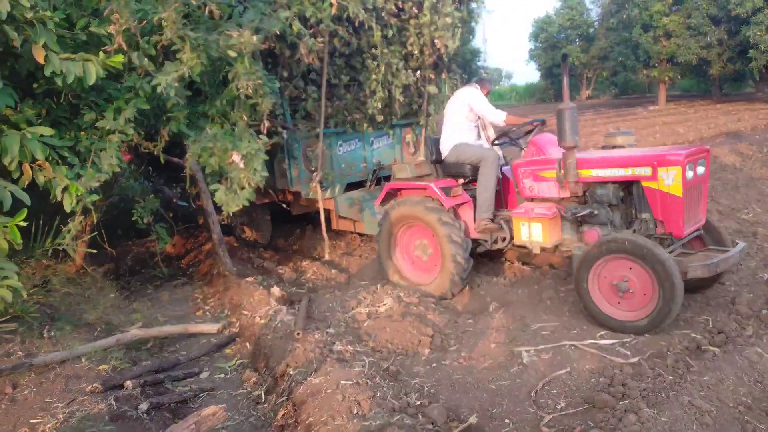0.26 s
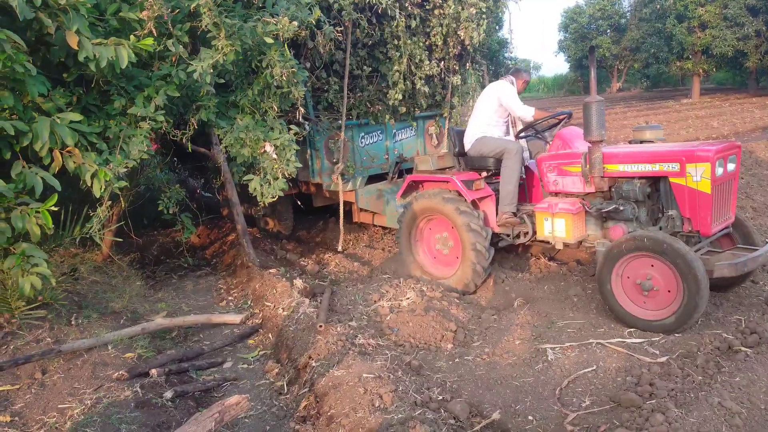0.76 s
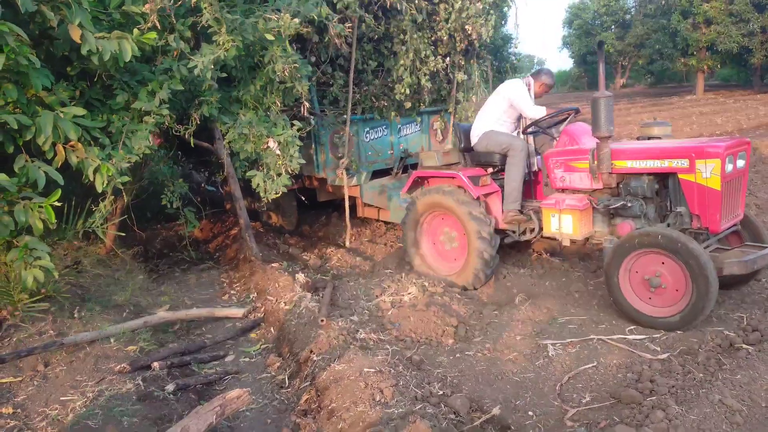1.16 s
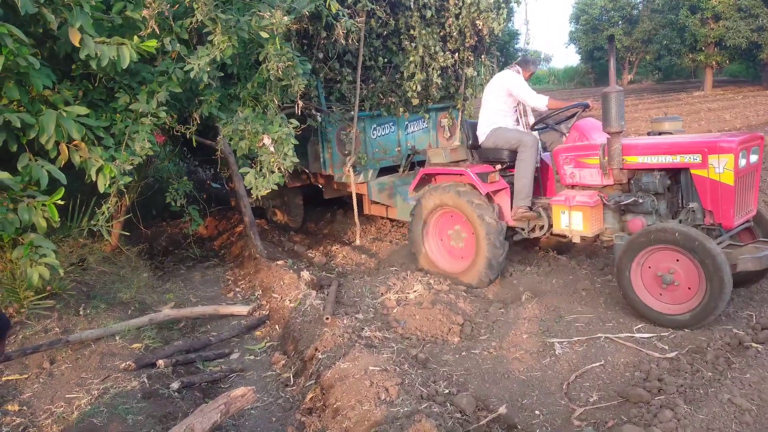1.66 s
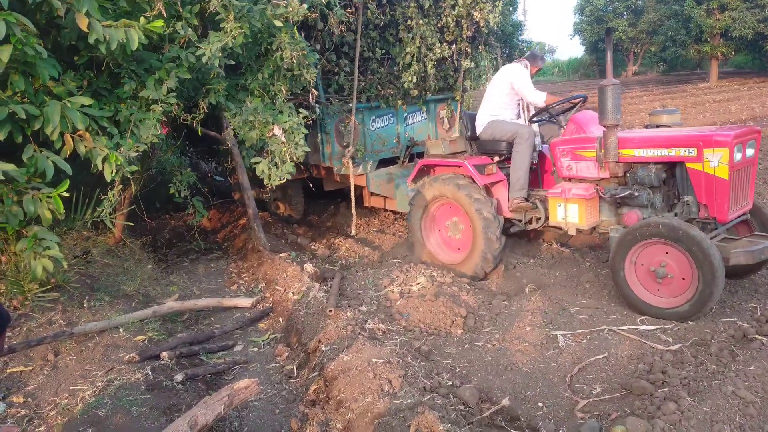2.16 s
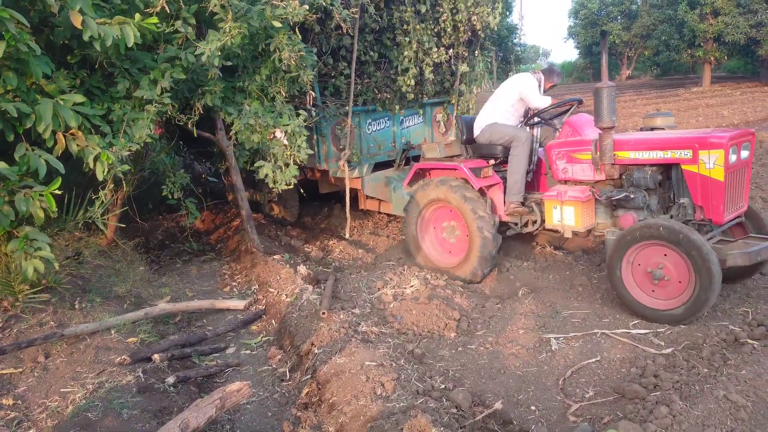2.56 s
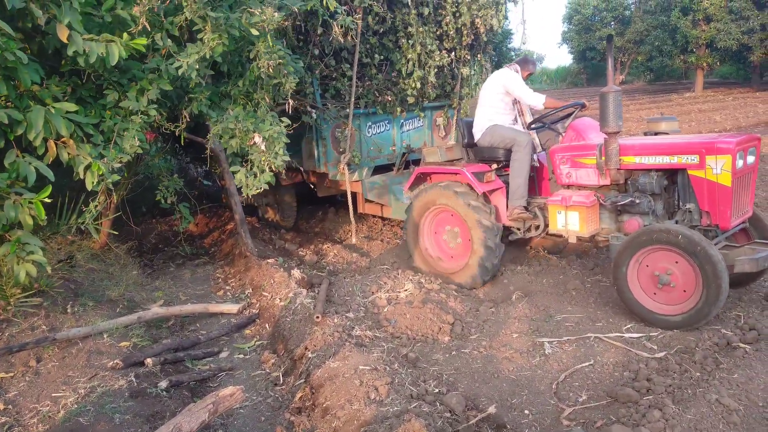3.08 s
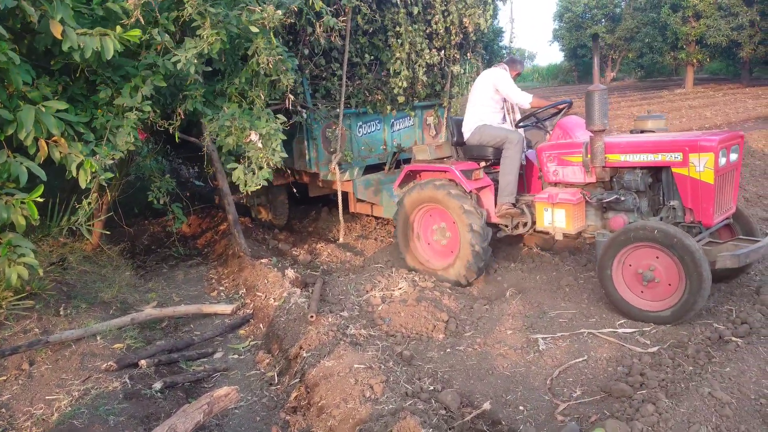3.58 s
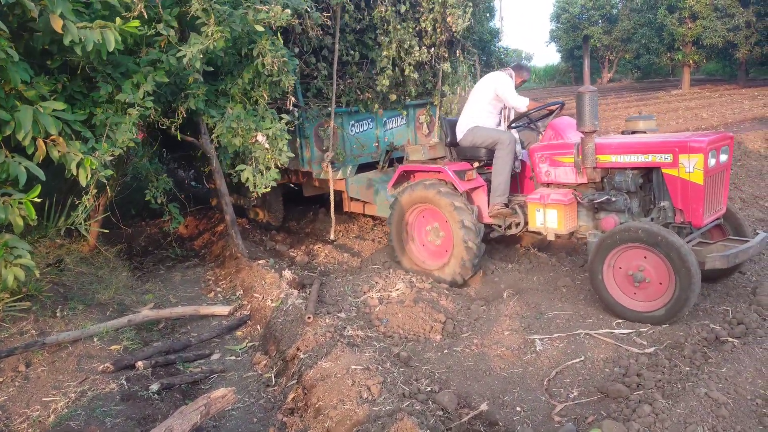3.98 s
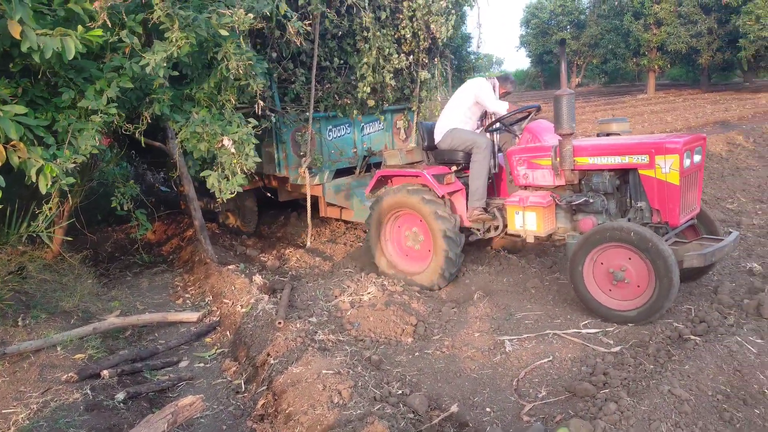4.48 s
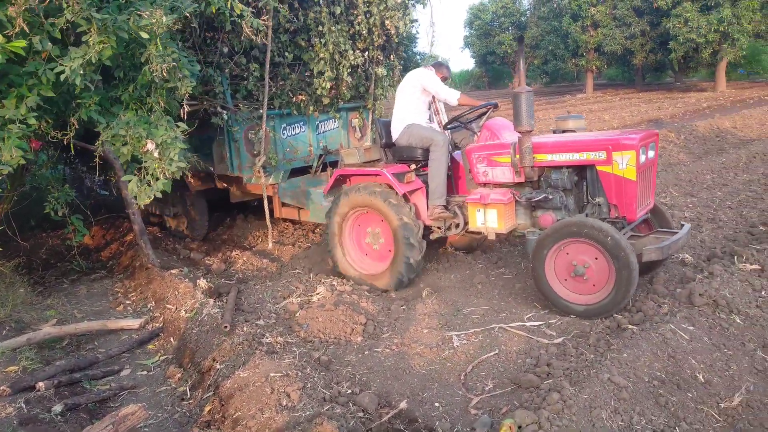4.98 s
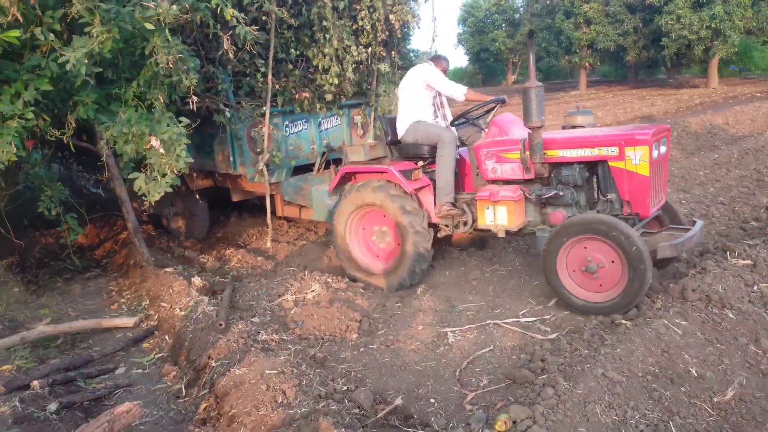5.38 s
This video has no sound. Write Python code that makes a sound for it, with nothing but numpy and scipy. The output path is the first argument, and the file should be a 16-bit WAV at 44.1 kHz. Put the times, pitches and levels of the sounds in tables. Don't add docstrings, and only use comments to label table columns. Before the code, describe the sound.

A small single-cylinder diesel tractor pops hard and fast, dropping several times into soft clattering puffs before the loud bursts return.

```python
import sys
import numpy as np
from scipy import signal
from scipy.fft import rfft, irfft
from scipy.io import wavfile

SR = 44100
rng = np.random.default_rng(int(sys.argv[2]) if len(sys.argv) > 2 else 0)


def magnitude_from_level(level_db):
    exponent = np.asarray(level_db, float) / 20
    return 10 ** exponent


def output_pcm(signal):
    pcm = np.clip(np.atleast_2d(signal).T, -1, 1) * 32767
    wavfile.write(sys.argv[1], SR, np.round(pcm).astype(np.int16))


N = 248724
SLUG_SAMPLES = round(0.07 * SR)


def rms_one(x):
    return x / np.sqrt(np.mean(x ** 2) + 1e-20)


def curve(rows, column):
    rows = np.array(rows)
    return np.interp(np.arange(N) / SR, rows[:, 0], rows[:, column])


def drift(rate_hz):
    settle = 9000
    r = np.exp(-2 * np.pi * rate_hz / SR)
    slow = signal.lfilter([1], [1, -2 * r, r * r], rng.standard_normal(N + settle))
    return rms_one(slow[settle:])


def lay(times, pieces):
    out = np.zeros(N + SR)
    for s, piece in zip(times, pieces):
        start = round(s * SR)
        out[start:start + len(piece)] += piece
    return out[:N]


def ring(clicks, hz, t60):
    r, w = magnitude_from_level(-60 / (t60 * SR)), 2 * np.pi * hz / SR
    return signal.lfilter([0, np.sin(w)], [1, -2 * r * np.cos(w), r * r], clicks + 1e-18)


def resonance(x, hz, width_hz):
    r = np.exp(-np.pi * width_hz / SR)
    feedback = [1, -2 * r * np.cos(2 * np.pi * hz / SR), r * r]
    return signal.lfilter([(1 - r * r) / 2, 0, (r * r - 1) / 2], feedback, x)


def coloured(x, spectrum):
    hz = np.maximum(np.fft.rfftfreq(N, 1 / SR), 1)
    points = np.array(spectrum)
    level_db = np.interp(np.log(hz), np.log(points[:, 0]), points[:, 1])
    return rms_one(irfft(rfft(x) * magnitude_from_level(level_db), N))


# (time [s], level [dB])
GEAR_LEVEL = [(0.0, -46), (0.45, -43), (0.67, -46.5), (0.91, -49.5), (1.13, -50), (1.24, -42), (1.36, -46),
              (1.44, -44), (1.9, -42), (2.12, -44.5), (2.56, -49.5), (2.76, -45.5), (2.92, -43),
              (3.08, -44.5), (3.71, -42), (3.9, -46), (4.04, -48.5), (4.3, -48), (4.48, -42.5), (4.7, -44),
              (5.64, -41)]
# (frequency [Hz], level [dB per Hz])
CLATTER_SPECTRUM = [(24, -47), (40, -44), (85, -5), (152, 3.5), (358, -1.5), (656, -10.5), (957, -4),
                    (1800, -10.5), (2200, -2.5), (3050, -13), (4340, -32), (4800, -27), (5730, -33.5),
                    (15300, -45.5), (16500, -56)]


def running_gear():
    heights = magnitude_from_level(2.6 * rng.exponential(1, N)) * rng.choice([-1, 1], N)
    grains = heights * (rng.random(N) < 2500 / SR)
    contacts = 0.42 * rms_one(grains) + rng.standard_normal(N)
    level_db = curve(GEAR_LEVEL, 1) + 1.5 + 2.2 * drift(38)
    return magnitude_from_level(level_db) * coloured(contacts, CLATTER_SPECTRUM)


# (time [s], fundamental [Hz], level [dB])
SQUEAK_PATH = [
    (5.17, 880, -73),
    (5.19, 907, -48),
    (5.23, 950, -56),
    (5.25, 940, -80),
    (5.31, 970, -78),
    (5.33, 982, -42),
    (5.4, 1020, -49),
    (5.46, 1033, -44),
    (5.5, 1060, -75),
]


def squeak():
    hz = curve(SQUEAK_PATH, 1) * (1 + 0.0038 * drift(39))
    phase = 2 * np.pi * np.cumsum(hz) / SR
    return magnitude_from_level(curve(SQUEAK_PATH, 2) + 3) * (np.sin(2 * phase) + magnitude_from_level(-10) * np.sin(phase))


# (share of cycle [1], level unfuelled [dB], level fuelled [dB], frequency [Hz], t60 [s])
BLOCK_BLOWS = [
    (0.6, -56, -65, 4200, .03),
    (0.79, -72.5, -60, 4750, .03),
    (0.94, -45, -32.5, 1080, 0.015),
    (0.92, -82.5, -35.5, 2250, 0.031),
    (.82, -68.5, -40, 2900, 0.015),
    (0.26, -49.5, -45, 1116, 0.079),
    (0.36, -73, -40.5, 2200, 0.026),
]


def block():
    s, thump_db = np.transpose(EXHAUST_STROKES)[:2]
    fuel = np.clip((thump_db[1:] + 54) / 15, 0, 1)
    chance = rng.standard_normal((len(s) - 1, len(BLOCK_BLOWS), 2))
    shake = np.exp(-np.arange(300) / 92)
    out = 0
    for k, (share, idle_db, fuelled_db, hz, t60) in enumerate(BLOCK_BLOWS):
        at = s[:-1] + np.diff(s) * np.clip(share + 0.018 * chance[:, k, 0], 0, 1)
        uneven_db = 2.2 * np.clip(chance[:, k, 1], -2, 2)
        size = magnitude_from_level(idle_db + fuel * (fuelled_db - idle_db) + uneven_db - 16.5)
        rattle = lay(at, size[:, None] * shake) * rng.standard_normal(N)
        out = out + resonance(ring(rattle, hz, t60), hz, 840)
    return out


def gas_slug(start_ms, rise_ms, hold_ms, fall_ms):
    ms = np.maximum(np.arange(SLUG_SAMPLES) / SR * 1000 - start_ms, 0)
    rise = np.sin(np.pi / 2 * np.minimum(ms / rise_ms, 1))
    fall = np.exp(-np.maximum(ms - hold_ms, 0) / fall_ms)
    return rise * fall, ms / 1000


# (time [s], thump [dB], silencer whistle [dB], rasp [dB], hiss [dB], whistle frequency [Hz])
EXHAUST_STROKES = [(0.0028, -21.5, -15, -29, -47.5, 1097), (0.0635, -22, -19.5, -27.5, -49, 1050),
                   (0.1251, -23, -17.5, -27, -50.5, 1075), (0.186, -22.5, -19.5, -26, -49.5, 1030),
                   (0.248, -22.5, -15.5, -32, -48, 1070), (0.3079, -22.5, -20, -25, -47, 1035),
                   (0.3689, -22.5, -19.5, -27, -46.5, 1050), (0.4278, -22.5, -14, -26.5, -48, 1066),
                   (0.4855, -21.5, -19.5, -23, -46.5, 1130), (0.5435, -23, -14.5, -26.5, -48, 1140),
                   (0.5989, -27, -31, -35, -53, 1300), (0.6644, -52, -41, -52, -73, 960),
                   (0.719, -48, -39, -44, -67, 1080), (0.775, -42, -36, -49, -66, 1080),
                   (0.8331, -42, -44, -48, -67, 990), (0.893, -46, -43, -46, -67, 1040),
                   (0.9476, -51, -45, -69, -68, 1070), (1.0095, -54, -40, -52, -68, 1220),
                   (1.0659, -50, -52, -59, -71, 1030), (1.1342, -46, -52, -50, -67, 1220),
                   (1.1787, -37.5, -43, -52, -63, 1190), (1.2421, -25.5, -20.5, -33, -53, 1114),
                   (1.3067, -23.5, -18.5, -33, -51.5, 1020), (1.37, -24, -15.5, -23, -48.5, 1056),
                   (1.434, -23, -16, -26.5, -48.5, 1065), (1.497, -24, -18.5, -24, -49.5, 1060),
                   (1.561, -23.5, -19.5, -25.5, -46.5, 1010), (1.625, -23.5, -18, -23.5, -44.5, 1047),
                   (1.6881, -23, -18, -19, -46, 1006), (1.7518, -26, -20, -26, -47.5, 1005),
                   (1.8156, -23.5, -19, -21.5, -50.5, 1054), (1.879, -23, -18.5, -25, -48, 1050),
                   (1.9406, -22.5, -17.5, -23, -47.5, 1055), (2.001, -24, -19, -29, -49, 1100),
                   (2.0607, -26.5, -29.5, -33.5, -55, 1230), (2.1184, -31, -37, -42, -60, 1300),
                   (2.1922, -63, -46, -50, -65, 950), (2.251, -52, -42, -49, -64, 1110),
                   (2.3039, -45, -39, -57, -61, 1100), (2.369, -50, -43, -50, -64, 1000),
                   (2.4286, -43.5, -46, -53, -68, 1110), (2.4907, -44.5, -39, -44, -65, 1020),
                   (2.5515, -52, -41, -45, -64, 1080), (2.617, -47, -50, -60, -69, 1070),
                   (2.6833, -53, -43, -55, -74, 1000), (2.7323, -25.5, -21.5, -29.5, -49.5, 1064),
                   (2.8011, -24.5, -22.5, -29, -50, 1065), (2.869, -22.5, -19, -27, -46.5, 1004),
                   (2.9374, -23, -20, -28, -46.5, 1067), (3.005, -22, -21.5, -26.5, -49.5, 1023),
                   (3.073, -22.5, -19.5, -29.5, -45.5, 1043), (3.1393, -23, -22.5, -26.5, -49, 1014),
                   (3.207, -23.5, -16, -29, -47, 1100), (3.276, -24.5, -19, -25.5, -48.5, 1113),
                   (3.3428, -23.5, -20, -28, -49, 1020), (3.4103, -24.5, -19.5, -28, -46.5, 1073),
                   (3.4771, -23, -19, -28.5, -50.5, 1014), (3.5442, -22.5, -18, -25.5, -48.5, 1070),
                   (3.609, -24.5, -18.5, -24.5, -47.5, 990), (3.6715, -22.5, -16, -25, -46, 1050),
                   (3.7329, -21.5, -15, -26, -47.5, 1054), (3.7923, -24, -20, -26.5, -46.5, 1000),
                   (3.8502, -36.5, -41, -44, -63, 1030), (3.9219, -49, -45, -54, -67, 1140),
                   (3.9793, -47, -42, -49, -63, 1110), (4.0427, -46, -44, -54, -61, 960),
                   (4.1005, -42, -41, -57, -65, 1140), (4.1588, -42, -45, -61, -67, 1020),
                   (4.2269, -55, -42, -59, -65, 1020), (4.274, -30.5, -31, -39, -60, 910),
                   (4.3377, -25, -19, -27, -46.5, 1075), (4.4018, -23, -16, -26.5, -46, 1050),
                   (4.4666, -23.5, -18.5, -28.5, -48, 1040), (4.531, -22, -15.5, -27.5, -47, 1070),
                   (4.5954, -21, -14, -24.5, -47, 1070), (4.66, -24, -15.5, -28.5, -46, 1086),
                   (4.7248, -24, -17, -25.5, -46, 1080), (4.7887, -22.5, -17.5, -26.5, -45.5, 1163),
                   (4.854, -23, -15, -24.5, -44.5, 1093), (4.919, -24, -14.5, -22.5, -46, 1107),
                   (4.9841, -24, -18, -24, -45, 1094), (5.0492, -23, -16.5, -27, -46.5, 1052),
                   (5.114, -23, -17.5, -27.5, -45, 1093), (5.1789, -22.5, -16, -24.5, -46, 1100),
                   (5.2439, -21.5, -16.5, -23.5, -46.5, 1005), (5.3089, -23.5, -17.5, -21.5, -45.5, 1077),
                   (5.3749, -22.5, -17.5, -27, -47.5, 1000), (5.4394, -23, -18, -24.5, -46.5, 1057),
                   (5.5042, -22, -18, -27.5, -45.5, 1160), (5.5698, -22.5, -17, -23.5, -46, 1043),
                   (5.6353, -18, -17, -17, -47, 1060)]
# (frequency [Hz], width [Hz], level [dB])
RASP_MODES = [
    (1680, 178, -2.5),
    (2280, 444, -1.5),
    (2904, 420, -3.5),
    (3470, 580, -18),
    (760, 170, -6),
    (1300, 204, 1.5),
    (4900, 500, -30),
]
# (frequency [Hz], level [dB per Hz])
HISS_SPECTRUM = [(3500, 15), (4300, -10.5), (5000, 1.5), (6000, -3), (7000, 0), (7800, -0.5), (8500, 1),
                 (9700, 5), (11000, -4), (13000, -13.5), (15500, -7.5)]


def exhaust():
    s, thump_db, whistle_db, rasp_db, hiss_db, whistle_hz = np.transpose(EXHAUST_STROKES)[:, :, None]
    times = s[:, 0]
    chance = rng.standard_normal((len(s), 4))[:, :, None]

    flow, t = gas_slug(0.71, 5.0, 6.08, 1.62)
    hz = 243 * (1 + 0.0068 * chance[:, 0])
    thump = magnitude_from_level(thump_db + 2.5) * flow * np.sin(2 * np.pi * hz * t)

    flow, t = gas_slug(2.793, 3.3, 5.1, 2.34)
    hz = 560 * (1 + 0.041 * chance[:, 2])
    thump += magnitude_from_level(thump_db - 3.5 + 1.43 * chance[:, 1]) * flow * np.sin(2 * np.pi * hz * t)

    flow, t = gas_slug(3.75, 6.6, 6.9, 11.7)
    hz = 103 * (1 + 0.011 * chance[:, 3])
    stack = magnitude_from_level(thump_db - 11.5) + magnitude_from_level(-48.5 + 2.7 * chance[:, 1])
    thump += stack * flow * np.sin(2 * np.pi * hz * t)

    flow, t = gas_slug(1.776, 0.8, 4.47, 1.5)
    wander = signal.lfilter([0.03], [1, -0.97], rng.standard_normal((len(s), SLUG_SAMPLES)))
    phase = 2 * np.pi * whistle_hz * t + np.cumsum(0.07 * wander * (t > 0.0015), axis=1)
    whistle = magnitude_from_level(whistle_db + 0.5) * flow * np.sin(phase)

    flow, t = gas_slug(2.08, 0.63, 3.48, 3.37)
    burst = rng.standard_normal(N) * lay(times, magnitude_from_level(rasp_db + 12.5) * flow)
    rasp = 0
    for k, (hz, width_hz, db) in enumerate(RASP_MODES):
        mode = resonance(resonance(burst, hz, width_hz), hz, 1.46 * width_hz)
        rasp = rasp + magnitude_from_level(db) * (-1) ** k * mode

    crack, t = gas_slug(2.24, 0.25, 2.2, 1.94)
    sigh, t = gas_slug(2.5, 0.5, 5.4, 14.8)
    high_pass = signal.butter(4, 3700, "high", fs=SR, output="sos")
    white = signal.sosfilt(high_pass, rng.standard_normal(N))
    hiss = coloured(white, HISS_SPECTRUM) * lay(times, magnitude_from_level(hiss_db) * (crack + magnitude_from_level(-6) * sigh))
    return lay(times, thump + whistle) + rasp + hiss


def trees(x):
    t = np.arange(round(0.3 * SR)) / SR
    tail = rng.standard_normal(len(t)) * magnitude_from_level(-60 * t / 0.56) * np.minimum(t / 0.004, 1)
    tail = signal.sosfilt(signal.butter(1, [140, 6000], "band", fs=SR, output="sos"), tail)
    return signal.fftconvolve(x, tail / np.sqrt(np.sum(tail ** 2)))[:N]


def scene():
    pops = exhaust()
    return (running_gear() + squeak() + block() + pops + magnitude_from_level(-19.5) * trees(pops))[None]


def roll_off(x):
    return signal.sosfilt(signal.butter(12, 16970, fs=SR, output="sos"), x)


def record(dry):
    cut = signal.sosfilt(signal.butter(4, 68, "high", fs=SR, output="sos"), dry)
    cut = signal.sosfilt(signal.cheby2(10, 50, 16900, fs=SR, output="sos"), cut)
    return roll_off(cut)


dry = scene()
out = record(dry)
output_pcm(out)
```